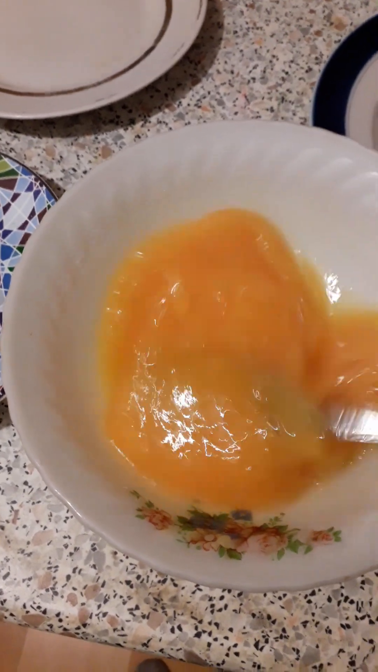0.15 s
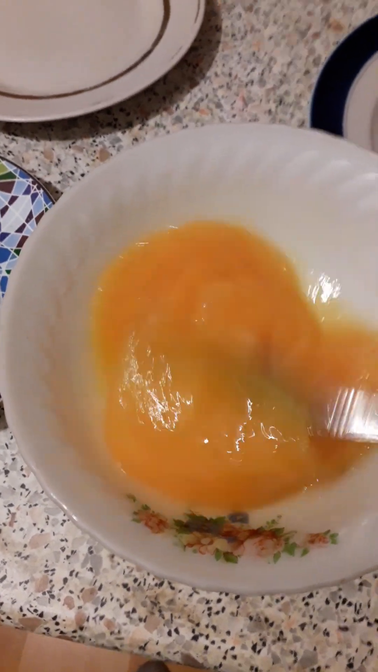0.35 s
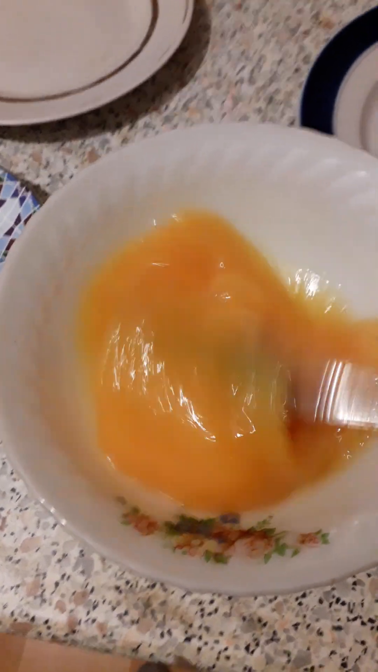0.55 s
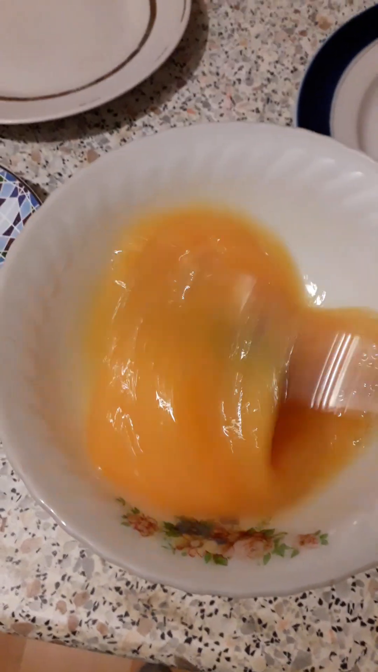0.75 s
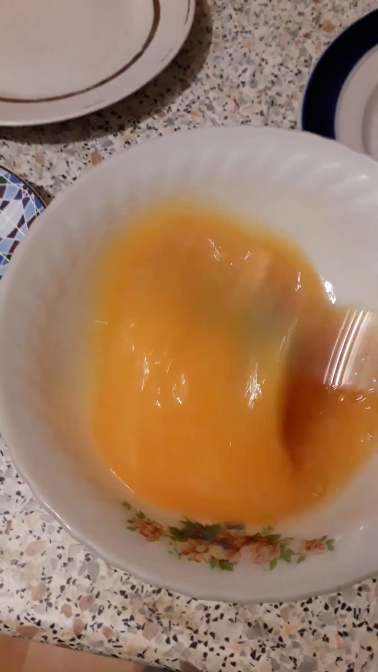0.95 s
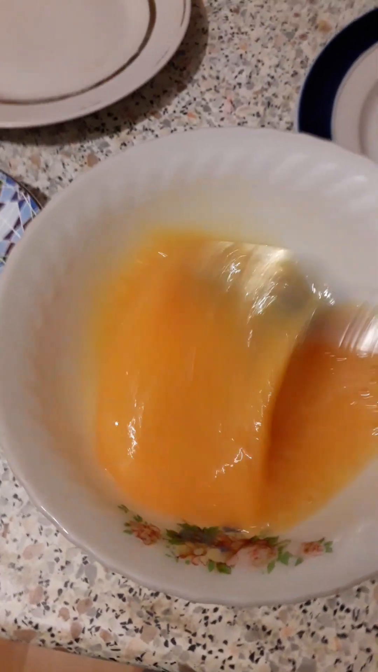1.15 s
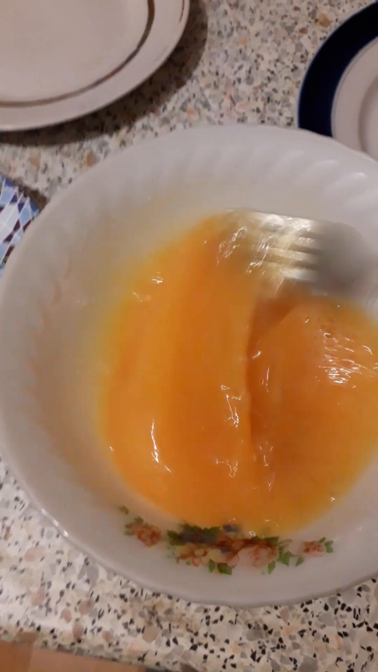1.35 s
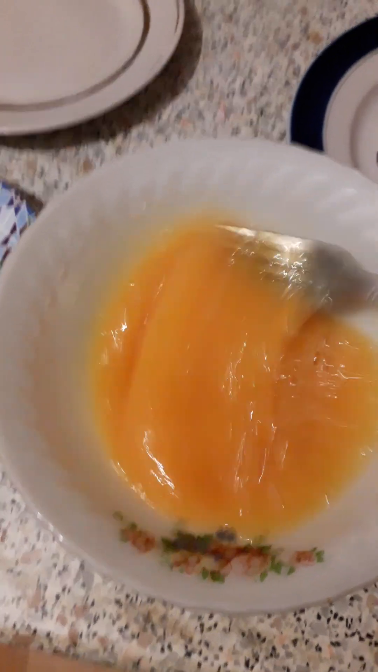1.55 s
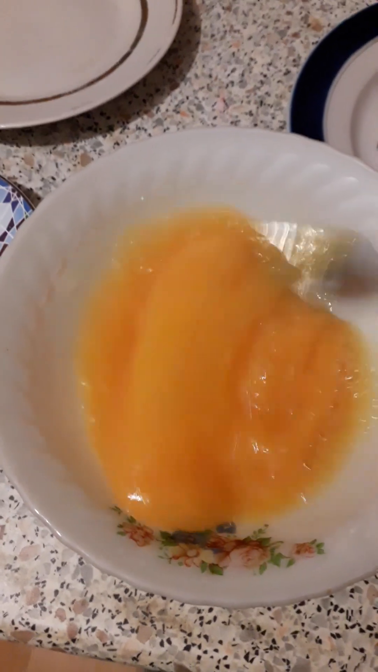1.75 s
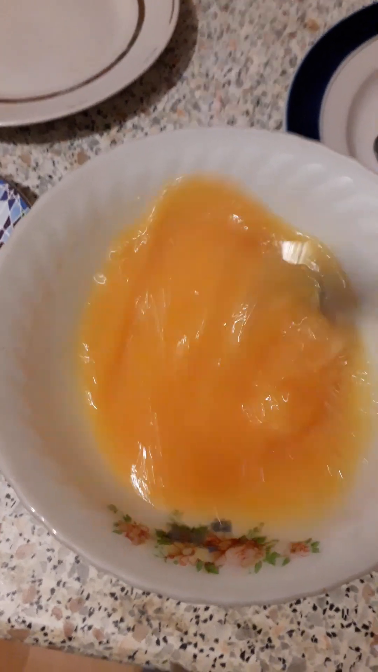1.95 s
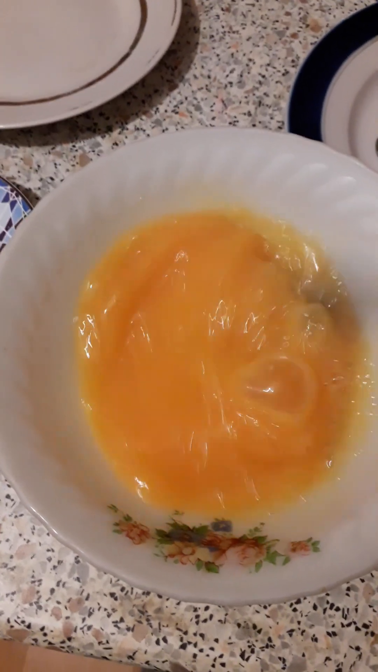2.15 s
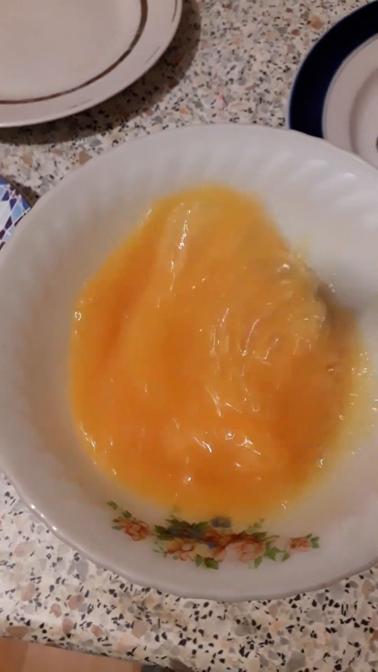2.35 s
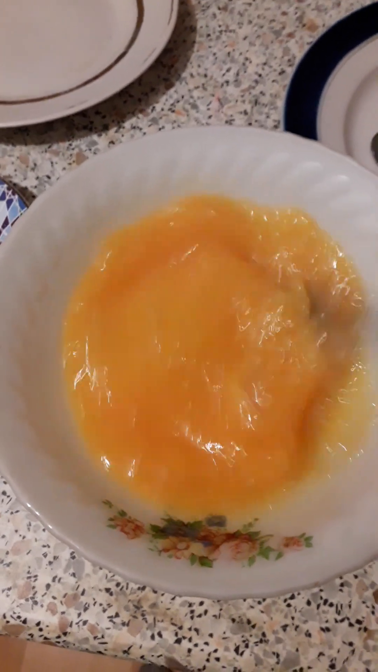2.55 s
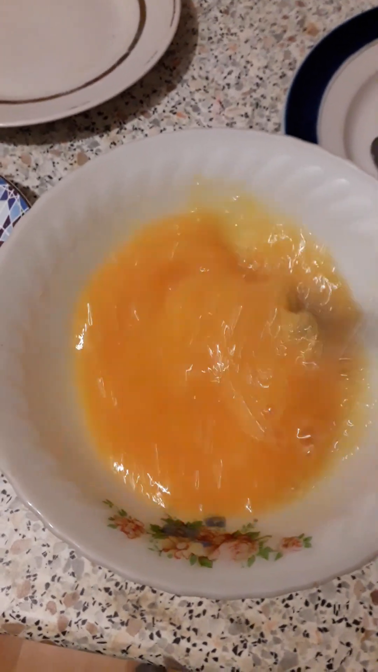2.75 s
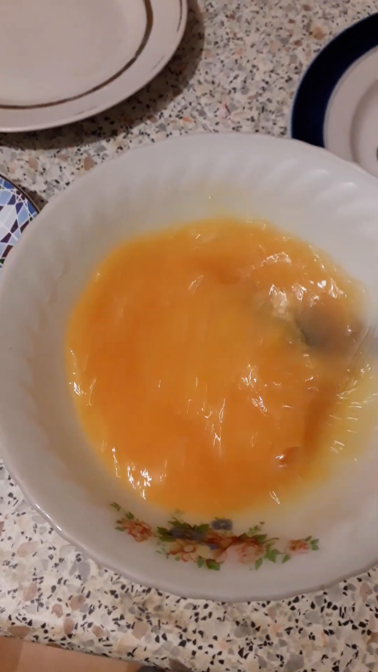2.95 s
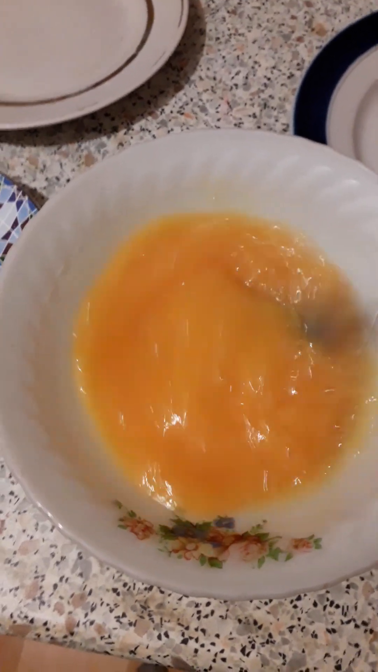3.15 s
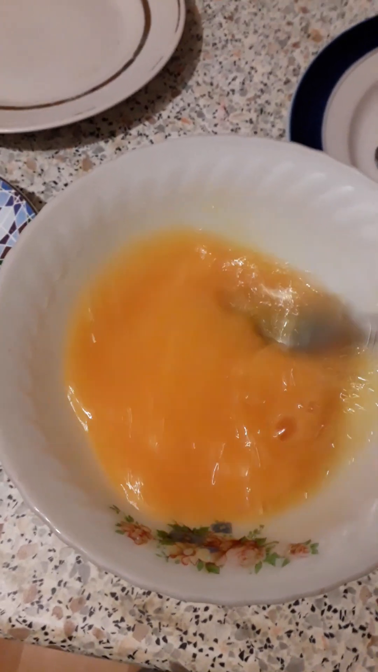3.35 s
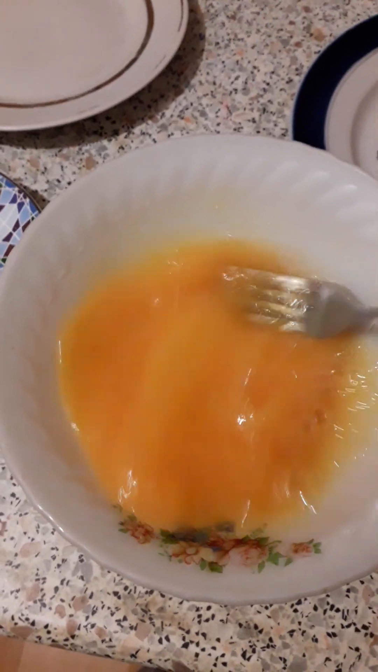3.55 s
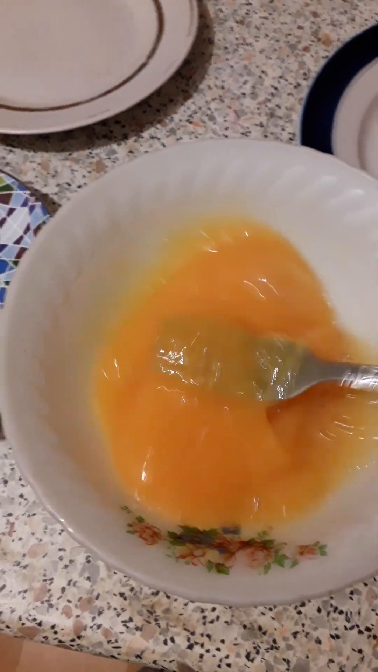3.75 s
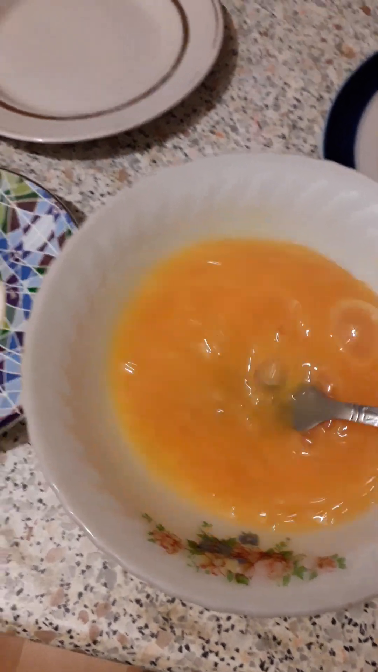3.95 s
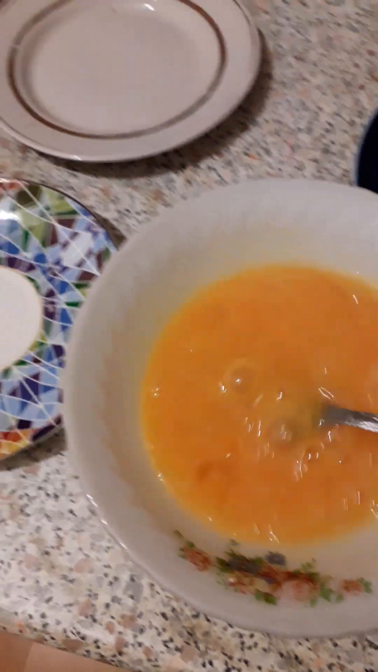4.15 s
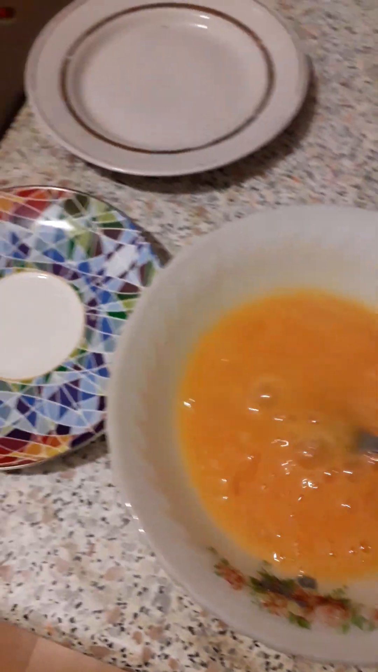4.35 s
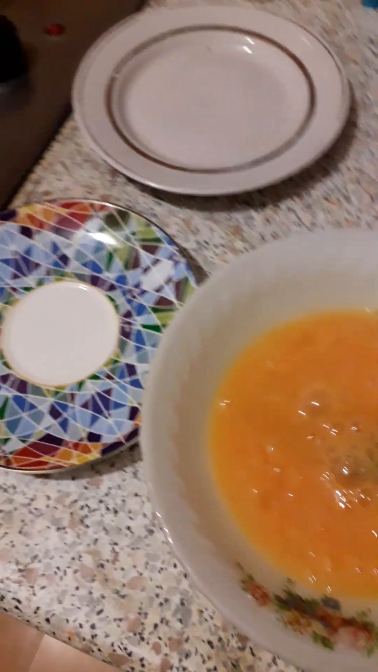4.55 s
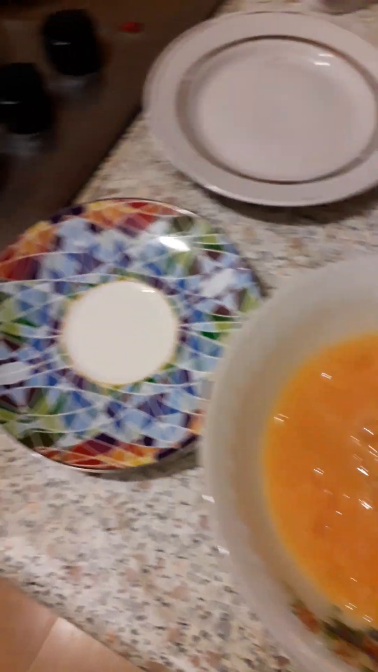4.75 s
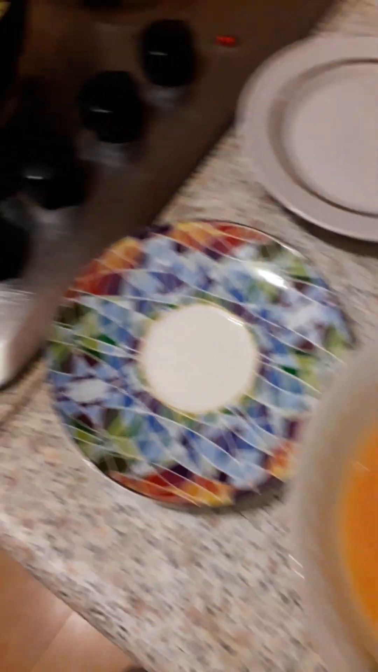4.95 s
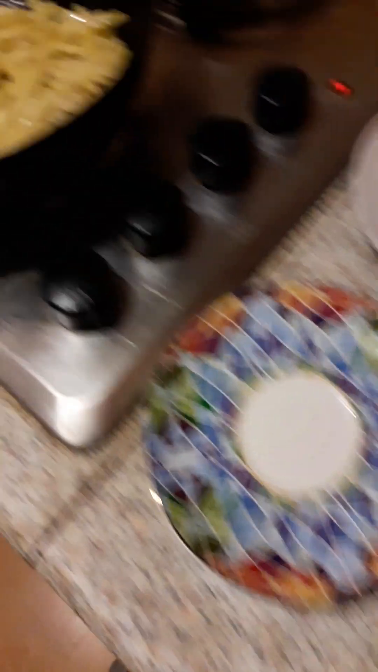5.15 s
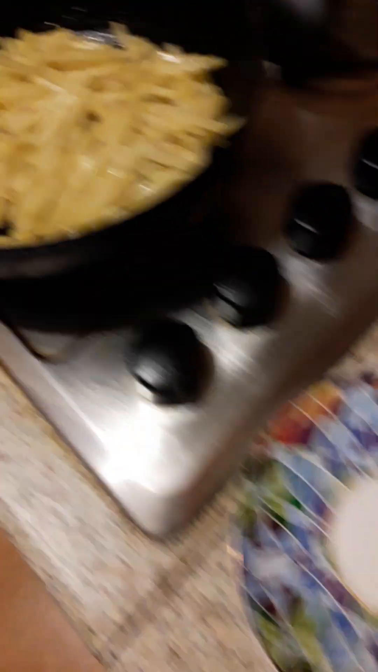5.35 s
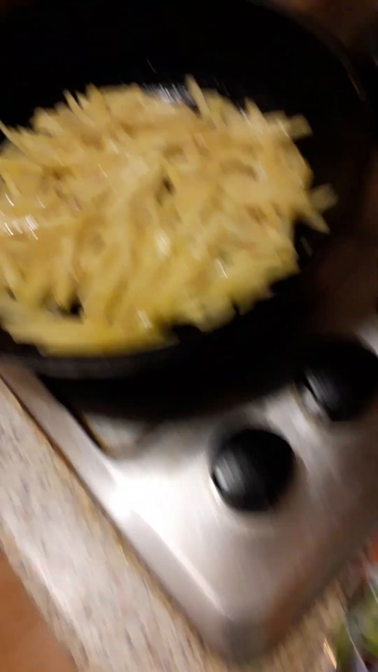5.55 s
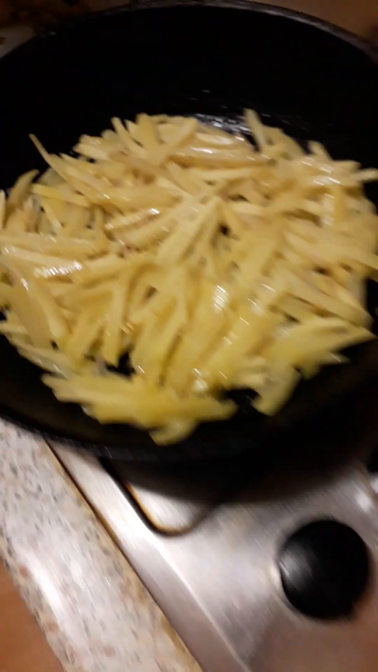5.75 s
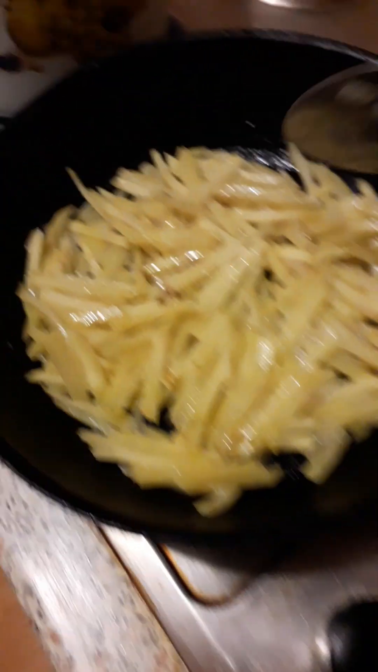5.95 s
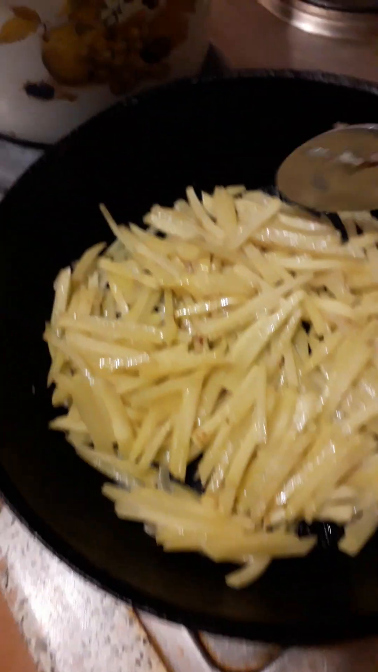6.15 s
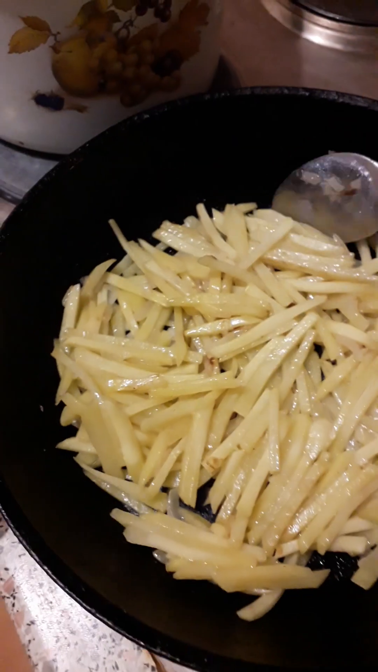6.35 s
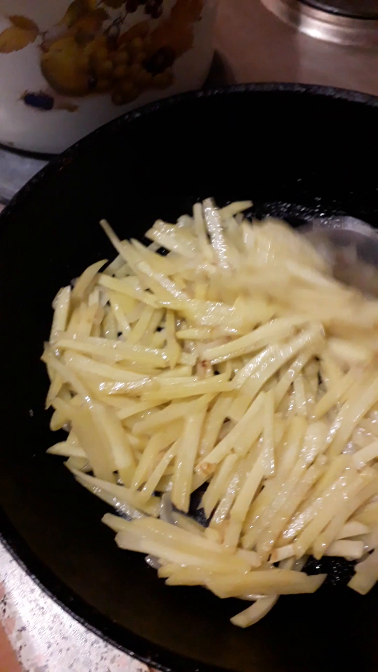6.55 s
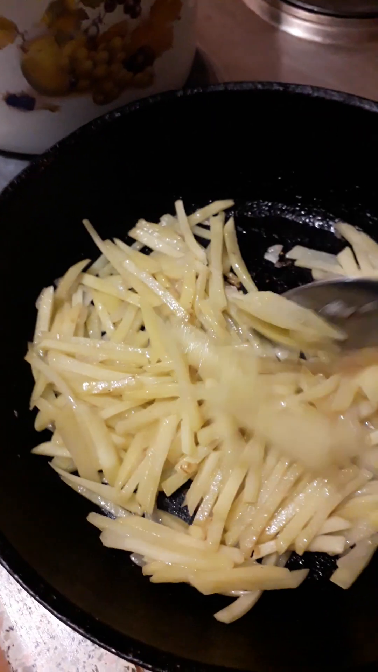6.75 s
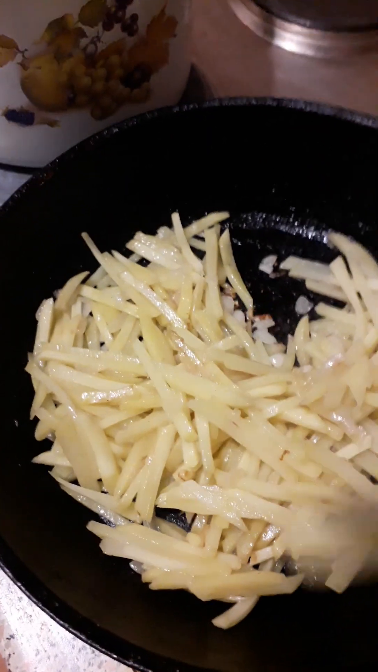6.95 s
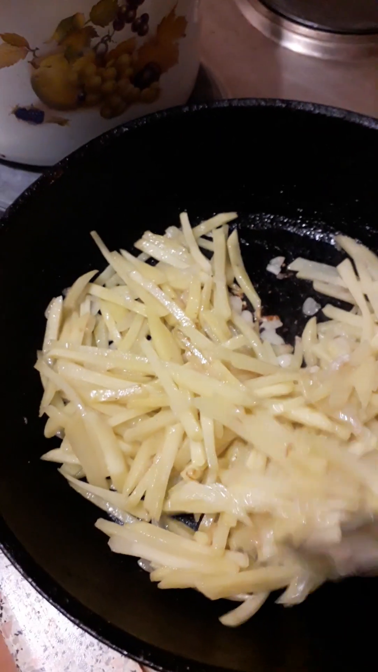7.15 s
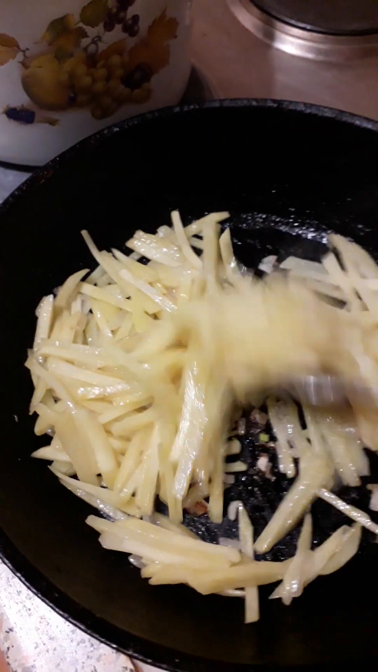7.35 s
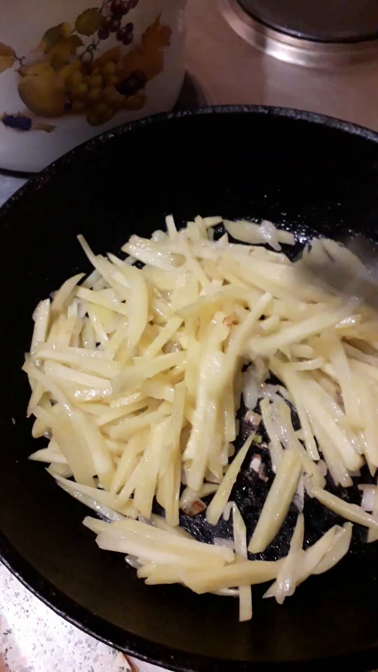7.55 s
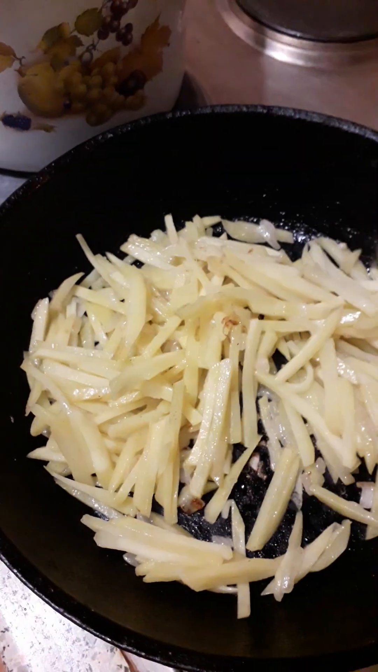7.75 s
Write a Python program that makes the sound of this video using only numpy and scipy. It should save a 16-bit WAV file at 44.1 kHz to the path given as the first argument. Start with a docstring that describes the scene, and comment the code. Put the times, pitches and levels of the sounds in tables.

```python
"""A small hard kitchen hums behind a fork beating eggs in a ceramic bowl, five strokes a second.
Noise bursts and grit are the tines clacking and dragging on the glaze; rising tones are the egg's glops.
The fork is laid on the rim; the microphone then moves over a pan where potato sizzles in oil,
made of hiss, crackle and popping drops, and a spoon knocks and pushes through it, ringing the pan's modes.
A soft rustle and a brief squeak come in between."""
import sys
import numpy as np
from scipy import signal
from scipy.fft import rfft, irfft
from scipy.io import wavfile
from scipy.ndimage import uniform_filter1d

SR = 44100
rng = np.random.default_rng(int(sys.argv[2]) if len(sys.argv) > 2 else 0)


def store_pcm(level_fs):
    """Save levels as 16-bit WAV."""
    pcm = np.round(np.clip(level_fs, -1, 1) * 32767).astype(np.int16)
    wavfile.write(sys.argv[1], SR, np.atleast_2d(pcm).T)


def boost(x):
    """Linear amplitude factor 10**(x/20) for a level x in decibels (scalar or array-like)."""
    u = np.asarray(x, float) / 20
    return 10 ** u


N = 344421
T = np.arange(N) / SR

# Colour of the kitchen hum. Each row: frequency in Hz, relative density in dB per Hz.
HUM_COLOUR = [(12, -56), (20, -40), (32, -11), (97, 2), (265, -17), (390, -5.5), (538, -6.5), (572, -11),
              (790, -6.5), (1010, -7), (2500, -33), (3250, -15), (5500, -120)]
# Partials of the squeak. Each row: multiple of the fundamental, relative level in dB.
SQUEAK_PARTIALS = [(1, -6), (2, -16), (3, -8), (4, -2), (9, -6), (12, -8)]
# Ringing modes of the pan. Each row: frequency in Hz, relative level in dB, t60 in seconds.
PAN_MODES = [(111.5, -6.5, 0.24), (355, -40, 0.088), (524, -17, 0.19), (968, 8.5, 0.026),
             (1340, 11.5, 0.012), (1785, 5.5, 0.024), (2350, 1, 0.041)]
# Spoon knocking the pan. Each row: time in seconds, relative strength in dB, contact in milliseconds.
SPOON_KNOCKS = [(6.362, -13, 0.46), (6.446, -25, 0.18), (6.472, -22.5, 0.32), (7.762, -24, 0.37)]
# Spoon sliding over the pan floor. Each row: start in seconds, rise in seconds, relative pressure
# at the peak in dB, pitch at the peak in Hz.
SPOON_SLIDES = [(6.359, 0.0096, -31, 479), (6.44, 0.0498, -39, 450.4), (7.09, 0.092, -34.5, 401),
                (7.756, 0.023, -37.5, 430)]
# Frying as heard. Each row: time in seconds, level in dB, fullness in dB (how far the low mids,
# and in part the treble, stand up around the middle).
SIZZLE = [(0, -47.5, 6.5), (2, -47.5, -2.5), (3.7, -48, 2.5), (4.3, -44.5, -5), (4.9, -42, -10.5),
          (5.5, -41.5, -4.5), (5.9, -40.5, -2.5), (6.3, -38, -3.5), (6.42, -38, 0), (6.55, -34, -0.5),
          (6.679, -38, -1.5), (6.77, -37.5, 1), (6.85, -38, 1), (6.95, -37.5, 3), (7.05, -39.5, 4.5),
          (7.16, -37, 1.5), (7.3, -34, 1), (7.5, -31, 0.5), (7.81, -30, 0)]
# Colour of the oil. Each row: frequency in Hz, relative density in dB per Hz.
OIL_COLOUR = [(200, -54.5), (500, -19), (1300, -12.5), (2500, -1), (3400, -4), (4400, 3), (5600, -2.5),
              (6600, -0.5), (7800, -4), (10000, -4.5), (11400, -3.5), (12800, -5.5), (15300, -5.5),
              (17000, -33)]
# Drops of water bursting in the oil. Each row: time in seconds, relative strength in dB, pitch in Hz.
WATER_POPS = [(4.2451, -29, 4320), (4.829, -36, 6200), (4.921, -31, 4260), (5.102, -32, 3840),
              (5.238, -24.5, 5700), (5.342, -37, 3840), (5.8016, -23.5, 12700), (5.876, -23, 2500),
              (6.0446, -29, 4470), (6.114, -31, 4350), (6.4535, -30, 4450), (6.4746, -16.5, 1890),
              (6.768, -20, 4800), (6.779, -23.5, 3220), (6.9438, -25, 1720), (7.4169, -10.5, 4620),
              (7.4929, -13, 6540), (7.6002, -14, 4850), (7.7283, -29, 1870), (7.7735, -22, 5040)]
# Beating strokes. Each row: tines bite in seconds, turn in seconds, relative drag after the turn in dB,
# relative egg slosh in dB.
STROKES = [(0.103, 0.149, -24, -49), (0.3, 0.331, -22, -46.5), (0.49, 0.518, -30, -43.5),
           (0.661, .719, -28.5, -42), (0.864, .909, -26, -41), (1.051, 1.101, -40, -38.5),
           (1.22, 1.287, -36, -43.5), (1.398, 1.461, -25, -42.5), (1.605, 1.64, -32, -43),
           (1.789, 1.83, -30, -38), (1.959, 2.027, -27, -40.5), (2.181, 2.235, -54, -47.5),
           (2.352, 2.409, -33.5, -43), (2.571, 2.614, -30, -46), (2.778, 2.816, -28, -51),
           (2.971, 3.018, -28, -48), (3.191, 3.225, -23.5, -56), (3.386, 3.435, -21, -50.5),
           (3.598, 3.644, -22.5, -48)]
# Air pockets closing in the egg. Each row: time in seconds, relative strength in dB, starting pitch in Hz.
GLOPS = [(.05, -31.5, 1090), (0.085, -30.5, 1100), (.3, -32.5, 1080), (.481, -32, 657), (0.565, -31, 1000),
         (.652, -23.5, 473), (.721, -29, 1127), (0.749, -26, 1070), (0.858, -26, 1130), (.909, -31.5, 333),
         (1.046, -27, 710), (1.125, -23.5, 685), (1.215, -15, 1050), (1.24, -28, 1100),
         (1.403, -16.5, 1084), (1.482, -25.5, 1376), (1.586, -20.5, 1100), (1.789, -29.5, 373),
         (1.965, -18, 627), (2.049, -34.5, 1404), (2.151, -23, 1094), (2.224, -22, 1110), (2.35, -24, 674),
         (2.462, -37.5, 794), (2.52, -25.5, 398), (2.604, -22.5, 765), (2.756, -24.5, 1090),
         (2.775, -38, 355), (2.972, -33.5, 352), (3.039, -33, 1086), (3.113, -34.5, 713),
         (3.223, -41, 1070), (3.255, -42, 1120), (3.345, -33, 1090), (3.463, -39, 1090),
         (3.561, -26.5, 1047), (3.665, -30.5, 1090), (3.676, -25, 1340), (3.8, -40.5, 676)]
# Tines meeting the glaze. Each row: time in seconds, strength in dB, tine ring in Hz, treble in dB,
# free ring of the bowl in dB, the last two relative to the strength.
CLACKS = [(0.0827, -24, 2220, -17, -11), (0.1079, -14.5, 2230, 2.5, 6), (.1442, -11.5, 2140, -2.5, -6),
          (.2831, -29.5, 2210, 5, 8), (0.2996, -12.5, 2270, -2.5, -11), (0.3319, -15.5, 2160, -1.5, 13),
          (0.4785, -15, 2090, -33, -14), (0.4965, -9.5, 2240, -5, 6), (0.5286, -6.5, 2720, -6, -11),
          (0.6649, -5, 2170, -30, -4), (0.6718, -17, 2510, 5.5, -12), (0.6846, -10, 2140, -4, -14),
          (.7188, -7, 2510, -4.5, -19), (.7358, -20.5, 2110, 6, -14), (0.8586, -13, 2140, -12, -10),
          (0.866, -12, 2530, -13, -6), (0.8744, -5.5, 2190, -2.5, -6), (.9081, -8.5, 2174, -5, -3),
          (.9244, -28, 2550, 12, -3), (1.046, -12, 2420, -24, -8), (1.061, -3.5, 2135, -6, -14),
          (1.0974, -3.5, 2330, -8, 4), (1.2134, -12, 2640, -14, -14), (1.2295, 2.5, 2440, -11.5, -10),
          (1.281, -7.5, 2270, -1.5, -22), (1.4056, -1.5, 2456, -9, -4), (1.4197, -5, 2270, -1, -4),
          (1.4677, -21, 2400, 2.5, 6), (1.5847, -10.5, 2160, -16, -8), (1.6097, -6, 2300, -5, 0),
          (1.65, -8.5, 2210, -4.5, -13), (1.773, -11, 2100, -23, 4), (1.7771, 1, 2666, -2.5, 16),
          (1.7945, -3.5, 2556, -2, 9), (1.8404, -7.5, 2230, -5.5, -8), (1.9671, -8.5, 2450, -19, -13),
          (1.9846, -9.5, 2560, -1, 3), (2.03, -14, 2210, 1.5, -1), (2.143, -21, 2520, -13, -8),
          (2.156, -16.5, 2280, -4, -10), (2.182, -5.5, 2175, -3, -13), (2.2245, -8.5, 2260, -2, -3),
          (2.3514, -20.5, 2820, 5, -16), (2.359, -5, 2660, -4, 12), (2.373, -7, 2685, -0.5, -29),
          (2.4212, -11.5, 2080, -3.5, 6), (2.5367, -15, 2150, -40, -13), (2.5545, -16.5, 2060, -24, -13),
          (2.576, -12, 2460, -1.5, 0), (2.6178, -7.5, 2574, -10, -12), (2.758, -14.5, 2520, -9, -16),
          (2.773, -9.5, 2380, -4.5, -23), (2.819, -11.5, 2570, -17, 9.5), (2.9447, -21.5, 1870, -15, -8),
          (2.9706, -10.5, 2620, -3.5, -14), (3.022, -13.5, 2300, -11, -12), (3.185, -13, 2220, -4.5, -7),
          (3.2265, -11, 2520, -15, -2), (3.3446, -15.5, 2900, -12, 12), (3.3876, -12, 2230, -3, -7),
          (3.4299, -10, 2680, -6, 8.5), (3.563, -17.5, 2880, -14, -20), (3.5702, -31.5, 2750, 21.5, -18),
          (3.5951, -10.5, 2150, -1, -13), (3.6417, -9, 2500, -8, -3)]
# Fork set down on the rim. Each row: time in seconds, relative strength in dB.
RIM_TAPS = [(3.9585, -11), (4.1212, -22.5), (4.1363, -20)]
# Fork shifting on the rim after it is set down. Each row: time in seconds, relative level in dB.
RIM_SETTLING = [(3.96, -28), (3.99, -43), (4.03, -48), (4.06, -40), (4.1, -48.5), (4.125, -41.5),
                (4.15, -32), (4.18, -51)]
# Ringing modes of the bowl: each entry is a frequency in Hz.
BOWL_HZ = [1132, 2330, 2672, 4090, 4900, 5782, 7728, 8760, 9846, 12220, 14770]
# One row for each mode in BOWL_HZ: relative level in dB struck under the egg, relative level in dB
# struck near the rim, t60 in seconds.
BOWL_MODES = [(-21.5, -17.5, 0.098), (-4.5, -21, 0.094), (-1, -11, 0.094), (-40, -3, 0.052),
              (-3, -23, 0.037), (-33, -0.5, 0.048), (-4, -13.5, 0.07), (-19, -13, 0.033),
              (-29, -13.5, 0.057), (-34, -22, 0.044), (-27, -19, 0.04)]
# Short ring of the fork and the egg-damped bowl. Each row: frequency in Hz, relative density in dB per Hz.
WET_BOWL_COLOUR = [(80, -38.5), (130, -6.5), (240, -28), (340, -5.5), (600, -21.5), (1100, -14),
                   (1650, -16), (2200, -2), (2650, -2), (3100, -9), (3700, -15.5), (7800, -3),
                   (8800, -11.5), (10300, -23), (11400, -2.5), (12400, -15.5), (13000, -13.5), (14100, -19),
                   (15200, -29), (16500, -30)]


def level(x, db):
    """Set the rms."""
    return x * boost(db) / np.sqrt(np.mean(x ** 2))


def colour(x, points):
    """Causal filter with the given (Hz, dB) shape, from the folded cepstrum; unit energy."""
    hz, db = np.transpose(points)
    size = 4096
    bins_hz = np.arange(size // 2 + 1) * SR / size
    cep = irfft(np.interp(np.log(bins_hz + 1), np.log(hz), db) * np.log(10) / 20)
    cep[1:size // 2] *= 2
    cep[size // 2 + 1:] = 0
    h = irfft(np.exp(rfft(cep)))
    return signal.fftconvolve(x, h / np.sqrt(np.sum(h ** 2)))[:len(x)]


def band(x, lo_hz, hi_hz):
    """Gentle band-pass."""
    return signal.sosfilt(signal.butter(2, [lo_hz, min(hi_hz, .45 * SR)], "band", fs=SR, output="sos"), x)


def ring(x, modes):
    """Drive a set of decaying modes, each a two-pole resonator."""
    out = 0
    for hz, db, t60 in modes:
        r, w = 1000 ** (-1 / (t60 * SR)), 2 * np.pi * hz / SR
        out = out + boost(db) * signal.lfilter([0, r * np.sin(w)], [1, -2 * r * np.cos(w), r * r], x)
    return out


def gain_curve(rows):
    """Gain over time from (s, dB) rows, silent outside them."""
    s, db = np.transpose(rows)
    inside = (T > s[0]) * (T < s[-1])
    return uniform_filter1d(boost(np.interp(T, s, db)) * inside, size=128)


def walk(rate):
    """Random levels held 1 / rate s and slewed twice; spread near 1."""
    k = int(SR / rate)
    held = np.repeat(rng.standard_normal(N // k + 1), k)
    return 1.3 * uniform_filter1d(uniform_filter1d(held, k), k)[:N]


def ticks(rate, spread_db):
    """Random clicks of widely scattered size, rate per second, rms 1."""
    hit = rng.random(N) < rate / SR
    size = boost(spread_db * np.minimum(rng.exponential(size=N), 3))
    return level(hit * rng.standard_normal(N) * size, 0)


def add(out, s, piece):
    """Mix a short sound in at time s."""
    i = int(s * SR)
    out[i:i + len(piece)] += piece[:N - i]


def swell(s, length):
    """A rounded rise and fall."""
    return np.sqrt(np.sin(np.pi * np.clip((T - s) / length, 0, 1)).clip(0))


def patchy(x, spread_db, rate):
    """The contact point keeps moving, so each band of the sound swells and fades on its own."""
    edges = 1500 * 1.4 ** np.arange(8)
    return sum(boost(spread_db * walk(rate)) * band(x, lo, hi) for lo, hi in zip(edges, edges[1:]))


def room(x):
    """Tiled walls: a dense tail of decaying noise after a short gap."""
    t60_s, wet_db = .3, -18
    t = T[:int(.5 * SR)]
    tail = band(rng.standard_normal(len(t)), 180, 13000) * 1000 ** (-t / t60_s) * (t > .004)
    return x + boost(wet_db) * signal.fftconvolve(x, tail / np.sqrt(np.sum(tail ** 2)))[:N]


def kitchen_hum():
    """Steady low noise, shaped by the hum's colour and drifting slightly in level."""
    return level(colour(rng.standard_normal(N), HUM_COLOUR) * boost(0.11 * walk(3.5)), -63)


def rustle():
    """Uneven low noise, soft, while the microphone is carried over."""
    start_s, length_s = 4.43, 0.63
    noise = band(rng.standard_normal(N), 280, 920) * boost(4.6 * walk(30))
    return swell(start_s, length_s) * level(noise, -61.5)


def squeak():
    """A brief stick-slip tone nearby with a few partials, sagging in pitch."""
    start_s, length_s = 4.862, .055
    start_hz, sag_hz_per_s = 440, 300
    hz = start_hz - sag_hz_per_s * np.clip(T - start_s, 0, length_s)
    phase = 2 * np.pi * np.cumsum(hz * (1 + 0.012 * walk(300))) / SR
    tone = sum(boost(db) * np.sin(multiple * phase) for multiple, db in SQUEAK_PARTIALS)
    return tone * boost(-43 + 2 * walk(60)) * swell(start_s, length_s) ** 3


def spoon():
    """Knocks ring the pan, a longer contact duller; a slide is a rough band that shakes the lowest modes."""
    fade_s, sag_hz_per_s = 0.06, 1200  # the pitch falls away on both sides of the peak
    press, pitch = np.zeros(N), np.zeros(N)
    for s, rise, db, hz in SPOON_SLIDES:
        late = T - s - rise
        press += boost(db) * np.clip((T - s) / rise, 0, 1) * np.exp(-late.clip(0) / fade_s)
        pitch = np.where(T >= s, (hz - sag_hz_per_s * np.abs(late)).clip(250), pitch)
    rough = level(band(ticks(2500, 1.3), 4, 90), 0)
    slide = press * rough * np.sin(2 * np.pi * np.cumsum(pitch) / SR)
    grain = 0.5 * press * level(band(ticks(2000, 1.5), 220, 1050), -0.39)
    shaken_pan = boost(-30) * ring(press * ticks(300, 1.2), PAN_MODES[:2])
    push = np.zeros(N)
    for s, db, ms in SPOON_KNOCKS:
        blow = np.hanning(max(int(ms * SR / 1000), 1) + 2)[1:-1]
        add(push, s + 0.00225, boost(db - 13) * blow / blow.sum())
    return ring(push, PAN_MODES) + slide + shaken_pan + grain


def frying():
    """Hiss, and crackle that grows as the pan comes near; low mids and treble follow fullness; drops pop."""
    treble_share = 0.41  # of the fullness in dB
    s, near_db, full_db = np.transpose(SIZZLE)
    near, treble, low = (boost(np.interp(T, s, db)) for db in (near_db, treble_share * full_db, full_db))
    close = np.clip(near * boost(35.0), 0, 1)
    # bubbles of each size burst on their own, so every octave crackles separately
    crackle = sum(level(band(ticks(500, 3.8), hz, 2 * hz), 10 * np.log10(hz / SR))
                  for hz in (500, 1000, 2000, 4000, 8000))
    hiss = rng.standard_normal(N) * boost(0.84 * walk(25))
    raw = hiss + close * boost(1.0 * walk(40)) * (1.31 * crackle + 0.25 * ticks(830, 1.6))
    oil = colour(raw, OIL_COLOUR)
    below_3300, below_8000 = (signal.sosfiltfilt(signal.butter(3, hz, fs=SR, output="sos"), oil)
                              for hz in (3300, 8000))
    out = near * (low * below_3300 + below_8000 - below_3300 + treble * (oil - below_8000))
    # the noise of the frying also rings the pan's higher modes
    out -= boost(-42.5) * near * close * low * ring(raw, PAN_MODES[4:])
    t = T[:int(.03 * SR)]
    fade = 1.5 * (1 - np.exp(-t / .0002)) * np.exp(-t / .0009)
    for s, db, hz in WATER_POPS:
        spatter = 1.02 * band(rng.standard_normal(len(t)), 2030, 11300)
        add(out, s, boost(db + 2.0) * fade * (np.sin(2 * np.pi * hz * t) + spatter))
    return out


def contact():
    """Gains of drag and slosh: the egg moves first, tines bite, press anew after the turn, ease to the lift."""
    drag_in_db = -34.5  # before the turn, on the same scale as the drag after it
    drag_out_s, drag_out_s_per_s = 0.032, 0.0046  # length after the turn, longer as the hand slows
    ease_db = -14  # reached at the lift
    slosh_lead_s, slosh_fade_s = 0.02, 0.031
    drag, slosh = np.zeros((2, N))
    for start, turn, out_db, slosh_db in STROKES:
        lift = turn + drag_out_s + drag_out_s_per_s * start
        easing_db = ease_db * np.clip((T - turn) / (lift - turn), 0, 1) ** 2
        drag += boost(drag_in_db) * (T >= start) * (T < turn)
        drag += boost(out_db + easing_db) * (T >= turn) * (T < lift)
        slosh += boost(slosh_db) * (T >= start - slosh_lead_s) * np.exp(-np.clip(T - lift, 0, 1) / slosh_fade_s)
    return uniform_filter1d(drag, size=100), uniform_filter1d(slosh, size=440)


def egg(stir):
    """Thick slosh with a scatter of small bubbles, and larger pockets; all climb in pitch as they close."""
    climb_hz_per_s = 4980
    out = stir * level(band(rng.standard_normal(N), 84, 970) * boost(3.4 * walk(50)), -6.5)
    t = T[:int(.1 * SR)]
    # small bubbles follow the strength of the slosh
    small = [(s, 20 * np.log10(stir[int(s * SR)] + 1e-9) + 8 - 14 * size, 400 + 1200 * pitch)
             for s, size, pitch in rng.random((240, 3)) * [4, 1, 1]]
    fade = (1 - np.exp(-t / 0.0011)) * np.exp(-t / 0.0088)
    for s, db, hz in GLOPS + small:
        wobble = 1 + 4.5 * band(rng.standard_normal(len(t)), 27, 400)
        tone = np.sin(2 * np.pi * (hz + climb_hz_per_s * t / 2) * t)
        add(out, s, boost(db) * wobble * tone * fade)
    return out


def fork(pressure):
    """Clacks are a tick, a short tine ring and a rattling tail; drag is dense tiny ticks; both excite the bowl."""
    thud_db, thud_per_db = -11, 0.96  # the thud grows more slowly than the clack
    drag_ring_db, drag_ring_db_per_s = -44.5, 1.5  # the tines ride higher on the wall as the beating goes on
    t = T[:int(.06 * SR)]
    thud, mid, treble, tine, under, rim = np.zeros((6, N))
    for s, db, hz, treble_db, free_db in CLACKS:
        noise = rng.standard_normal(len(t)) * (1 - np.exp(-t / 0.00015))
        add(mid, s, boost(db) * noise * (np.exp(-t / 0.0021) + 0.15 * np.exp(-t / 0.014)))
        bright_fade = np.exp(-t / 0.00044) + 0.096 * np.exp(-t / 0.0098)
        add(treble, s, boost(db + treble_db + 18.5) * noise * bright_fade)
        add(thud, s, boost(thud_db + thud_per_db * db) * noise * np.exp(-t / 0.01))
        # two tines, unequal
        other_hz = hz * (1 + 0.097 * rng.uniform(-0.44, 1))
        pair = np.sin(2 * np.pi * hz * t) + 0.14 * np.sin(2 * np.pi * other_hz * t)
        add(tine, s, boost(db - 4) * pair * (1 - np.exp(-t / 0.00096)) * np.exp(-t / 0.0036))
        add(under, s, boost(db + free_db - 22.0) * noise * np.exp(-t / 0.00012))
    for s, db in RIM_TAPS:
        tap = boost(db) * rng.standard_normal(len(t)) * np.exp(-t / 0.0046)
        add(mid, s, 0.55 * tap)
        add(thud, s, 0.15 * tap)
        add(rim, s, boost(-18.0) * tap)
    grit = boost(2.5 * walk(120)) * (.85 * ticks(1800, 3) + .6 * rng.standard_normal(N))
    drag = pressure * boost(7.0) * grit
    settle = gain_curve(RIM_SETTLING) * grit
    rim += boost(drag_ring_db + drag_ring_db_per_s * T) * drag + boost(-18.5) * settle
    low = band(thud + 2.3 * settle, 95, 1980)
    middle = band(mid + drag + 0.53 * settle, 1000, 7300)
    high = band(treble + 1.87 * drag, 10620, 19800)
    wet = low + patchy(middle + high, spread_db=2.5, rate=60)
    under_db, rim_db, t60 = np.transpose(BOWL_MODES)
    bowl = ring(under, zip(BOWL_HZ, under_db, t60)) + ring(rim, zip(BOWL_HZ, rim_db, t60))
    return colour(wet, WET_BOWL_COLOUR) + tine + bowl


def scene():
    """Everything close, with a little kitchen echo on all but the frying and the hum."""
    drag, slosh = contact()
    echoing = room(rustle() + squeak() + spoon() + egg(slosh) + fork(drag))
    return (kitchen_hum() + frying() + echoing)[None]


def top_cut(x):
    """Nothing passes above the cut-off."""
    return signal.sosfilt(signal.butter(12, 16980, fs=SR, output="sos"), x)


def record(dry):
    """The microphone loses deep bass and the top, rounds the loudest peaks and adds its own low noise."""
    x = signal.sosfilt(signal.butter(4, 95, "high", fs=SR, output="sos"), dry)
    self_noise = level(band(rng.standard_normal(N), 44, 60), -80)
    x = np.tanh(0.76 * x) / 0.84 + self_noise
    mix = signal.sosfilt(signal.ellip(8, .2, 90, 15900, fs=SR, output="sos"), x)
    return top_cut(mix)


dry = scene()
out = record(dry)
store_pcm(out)
```